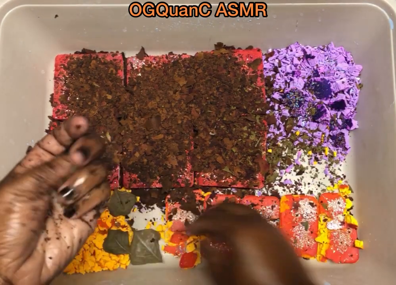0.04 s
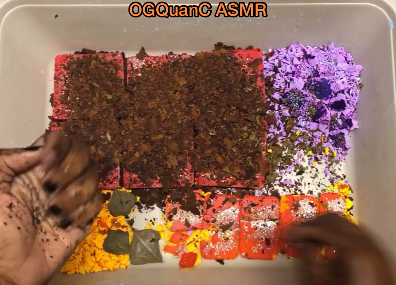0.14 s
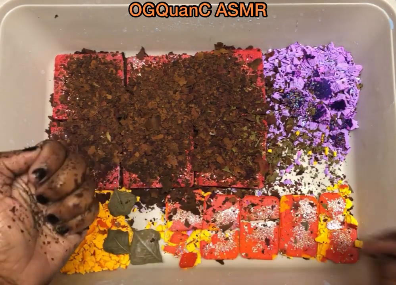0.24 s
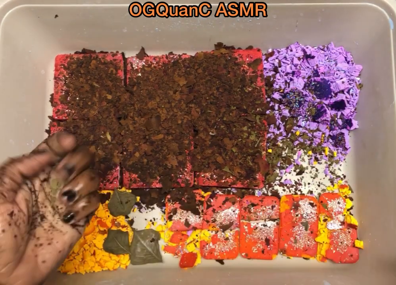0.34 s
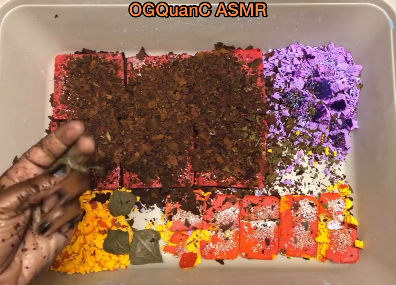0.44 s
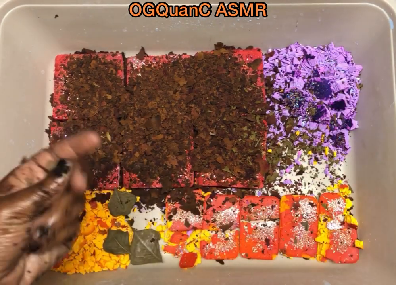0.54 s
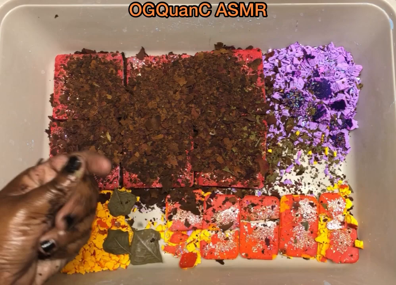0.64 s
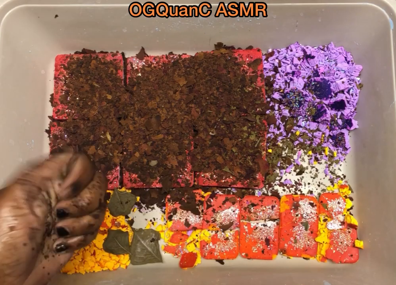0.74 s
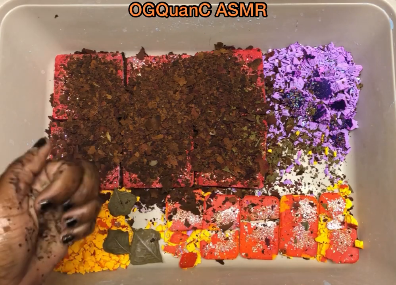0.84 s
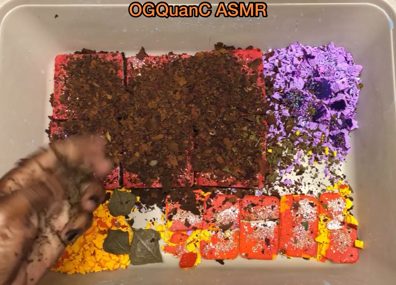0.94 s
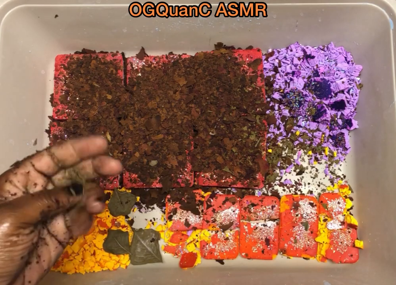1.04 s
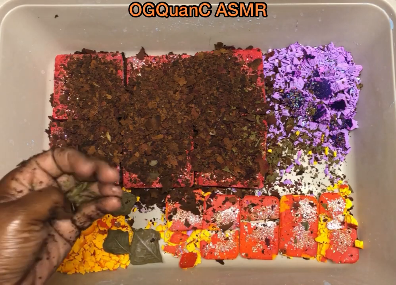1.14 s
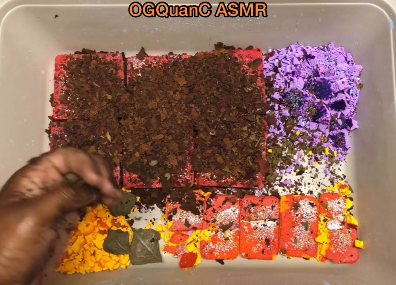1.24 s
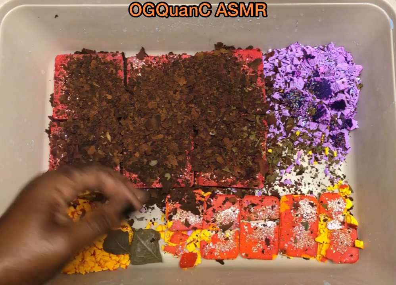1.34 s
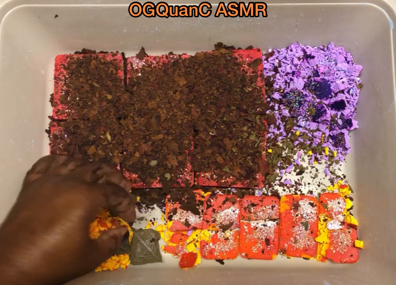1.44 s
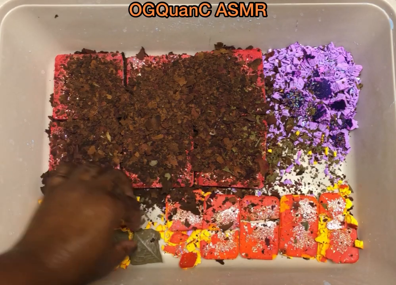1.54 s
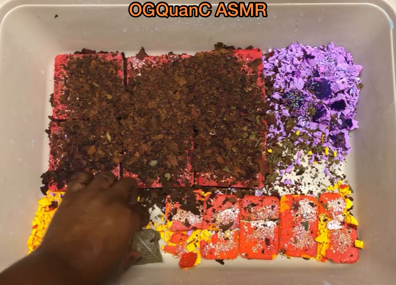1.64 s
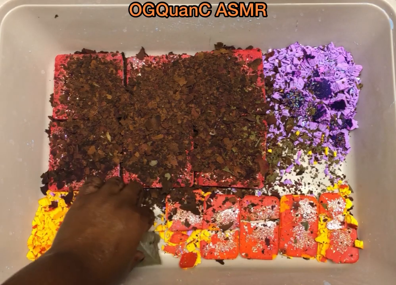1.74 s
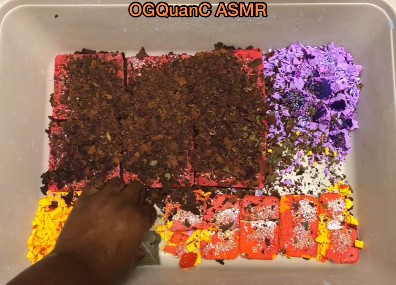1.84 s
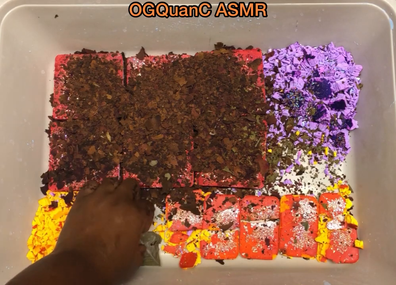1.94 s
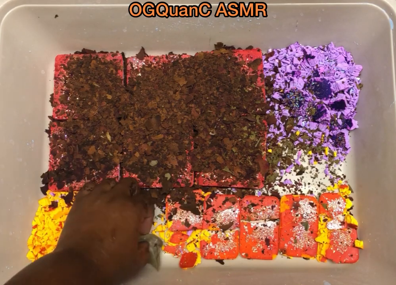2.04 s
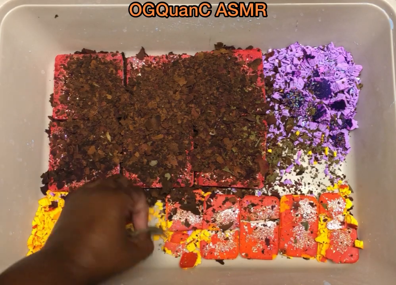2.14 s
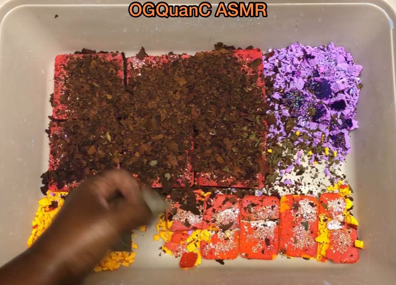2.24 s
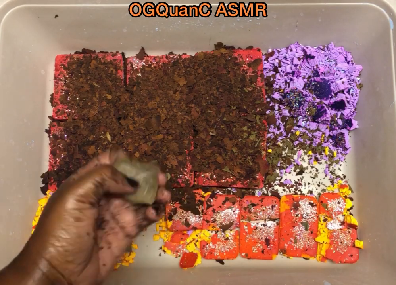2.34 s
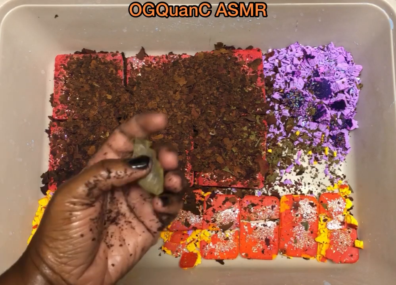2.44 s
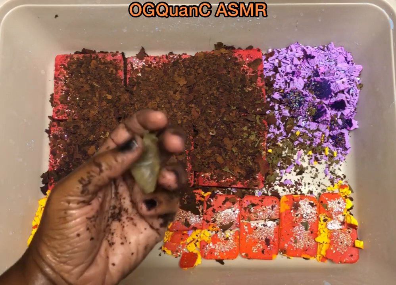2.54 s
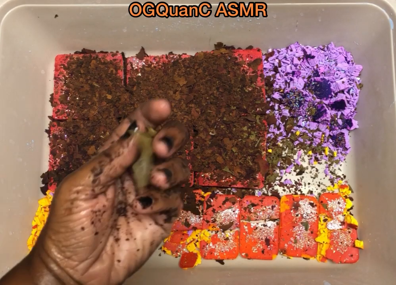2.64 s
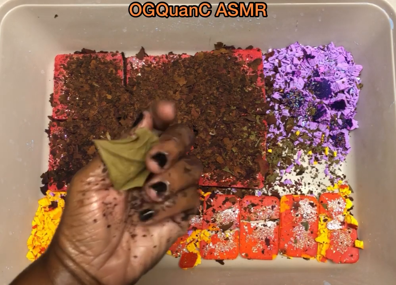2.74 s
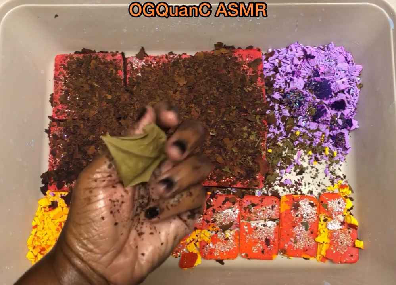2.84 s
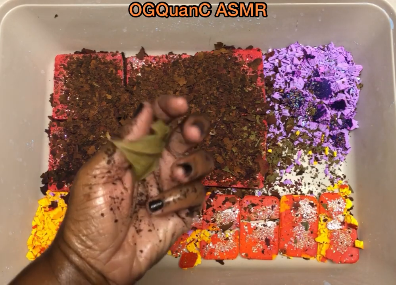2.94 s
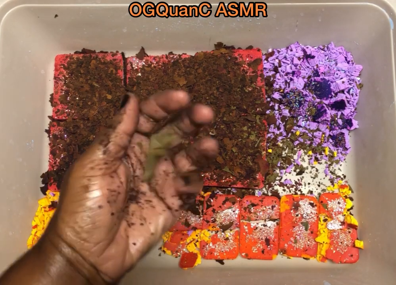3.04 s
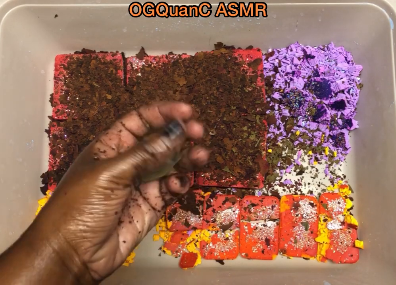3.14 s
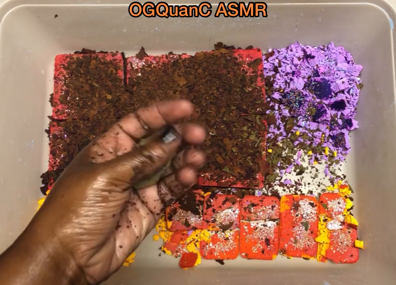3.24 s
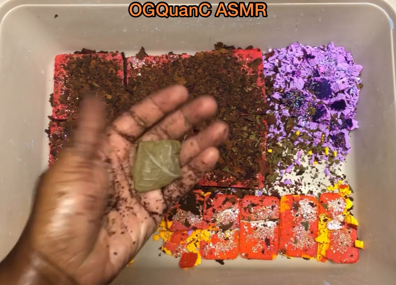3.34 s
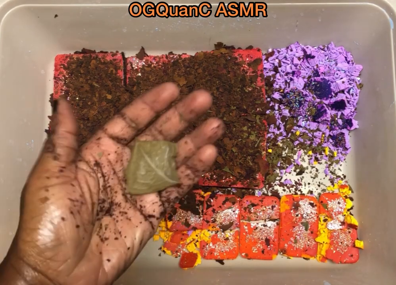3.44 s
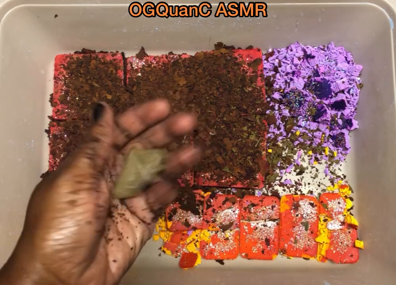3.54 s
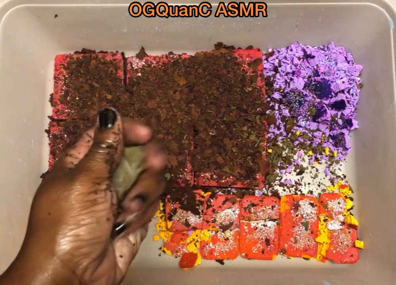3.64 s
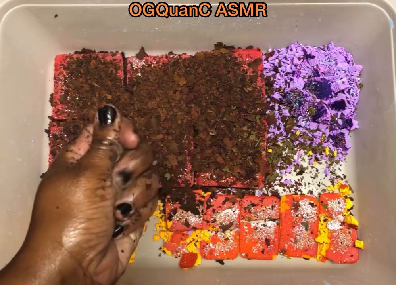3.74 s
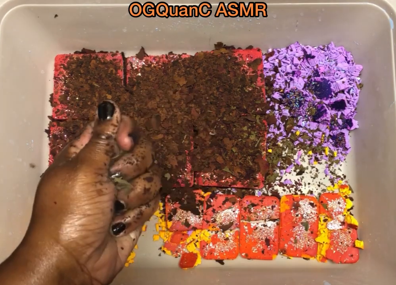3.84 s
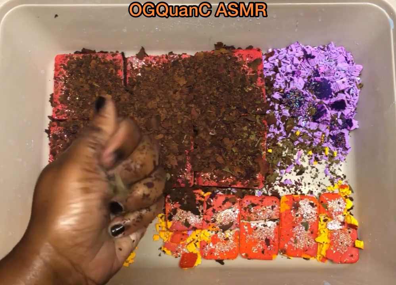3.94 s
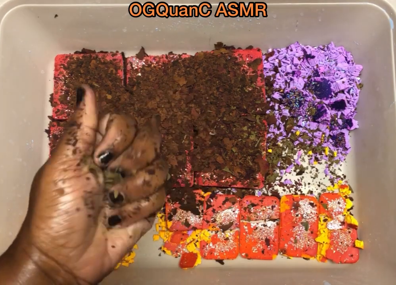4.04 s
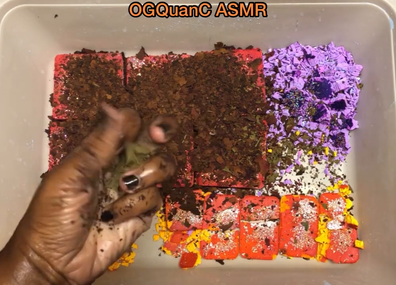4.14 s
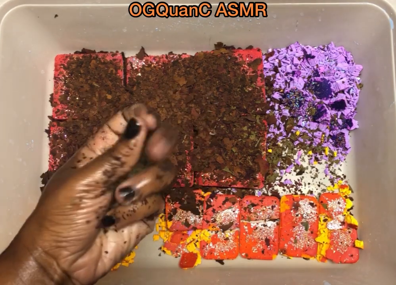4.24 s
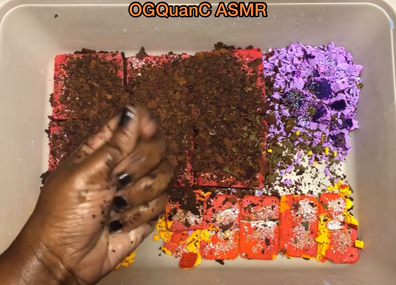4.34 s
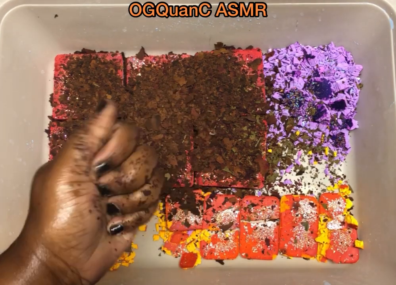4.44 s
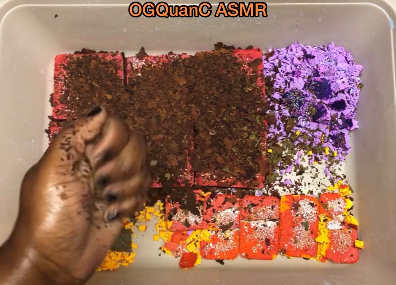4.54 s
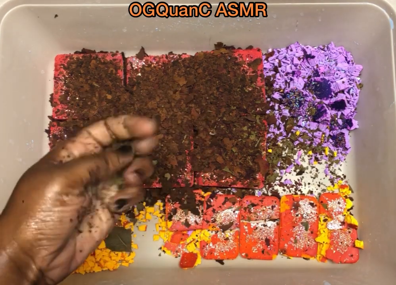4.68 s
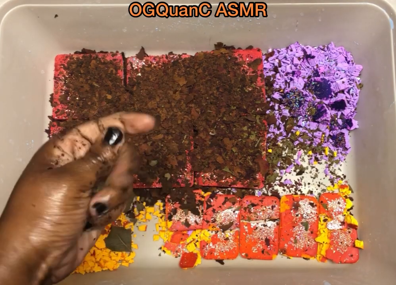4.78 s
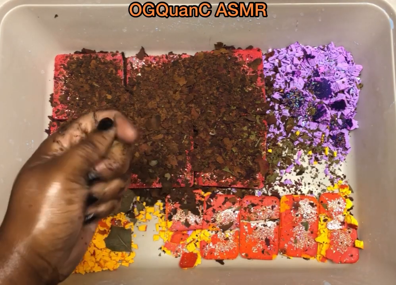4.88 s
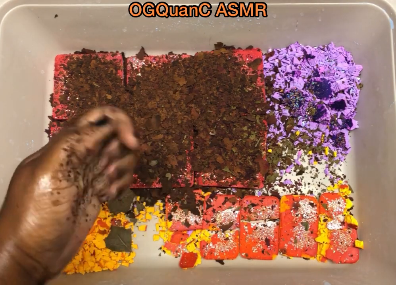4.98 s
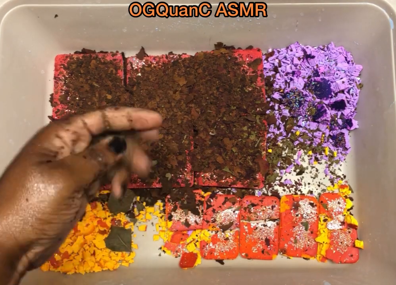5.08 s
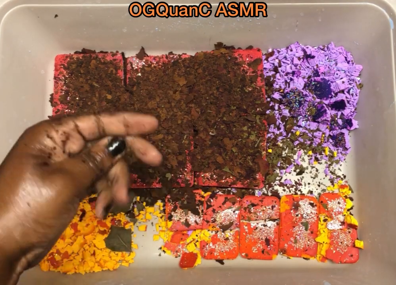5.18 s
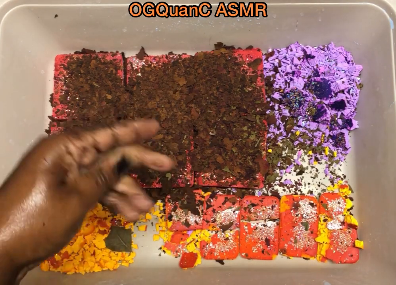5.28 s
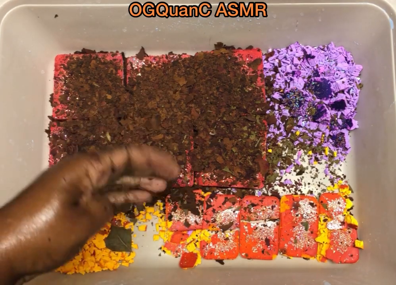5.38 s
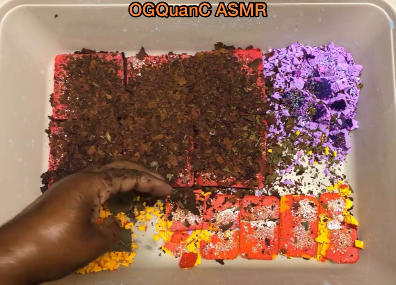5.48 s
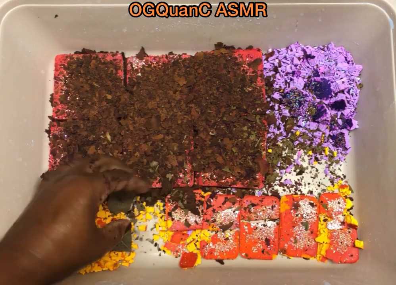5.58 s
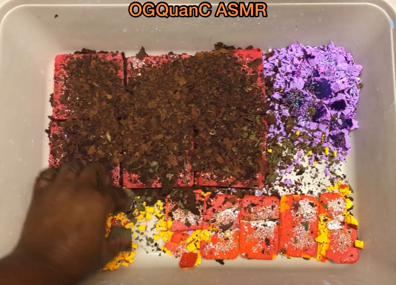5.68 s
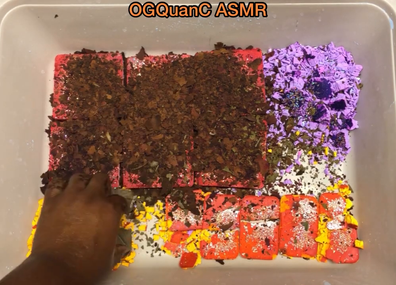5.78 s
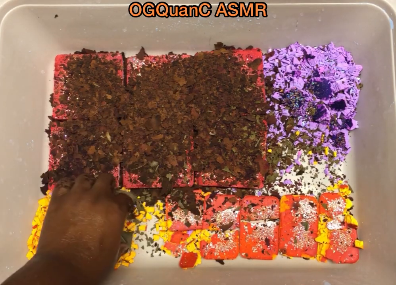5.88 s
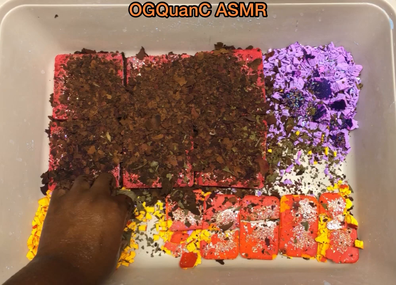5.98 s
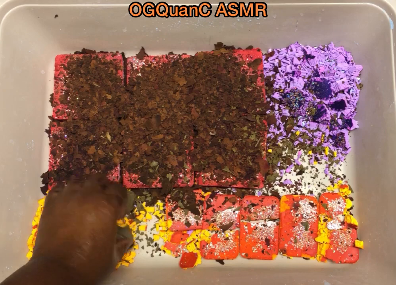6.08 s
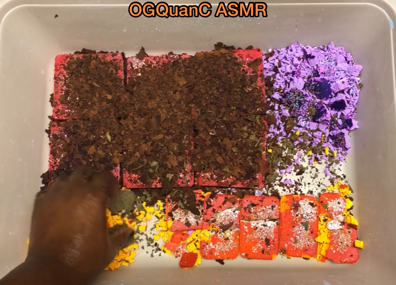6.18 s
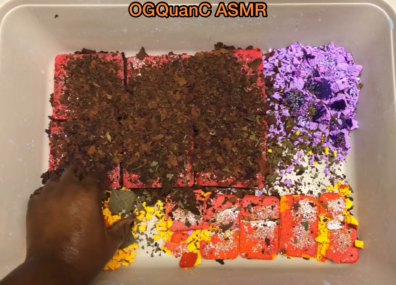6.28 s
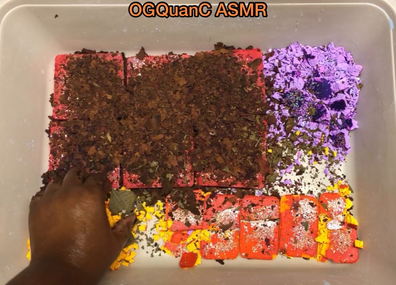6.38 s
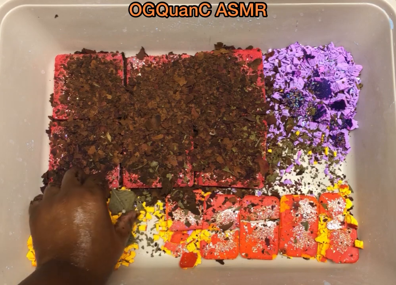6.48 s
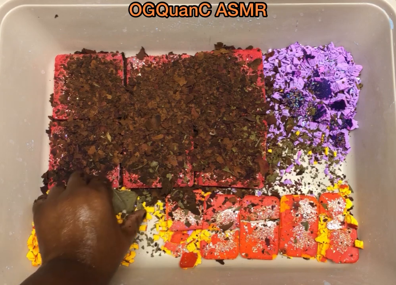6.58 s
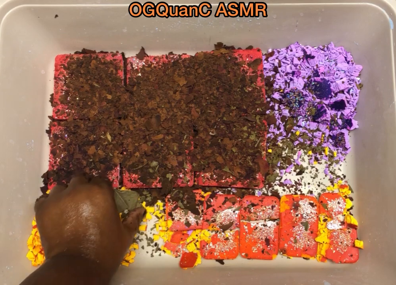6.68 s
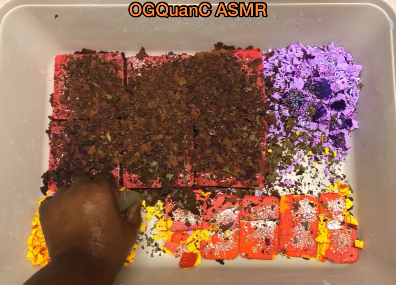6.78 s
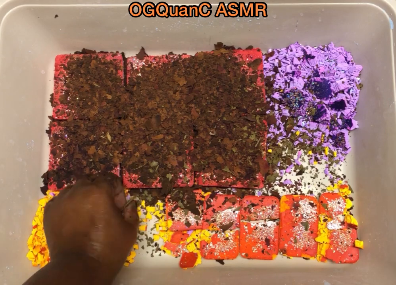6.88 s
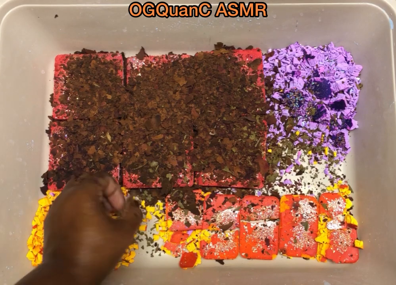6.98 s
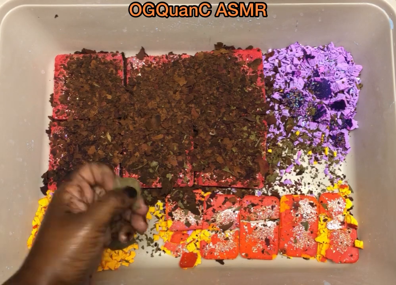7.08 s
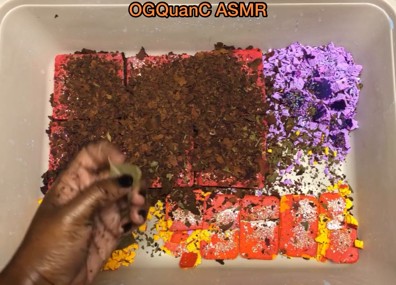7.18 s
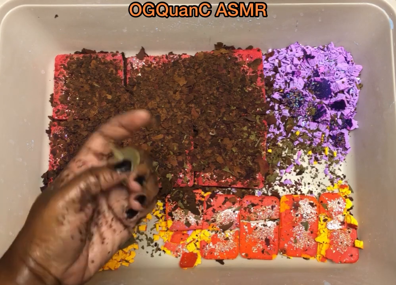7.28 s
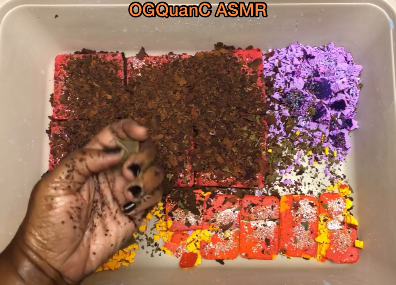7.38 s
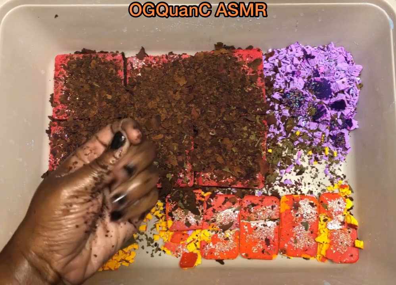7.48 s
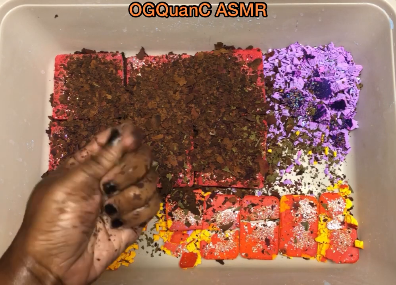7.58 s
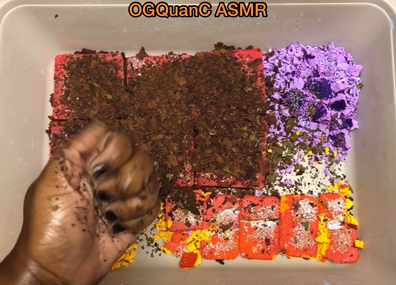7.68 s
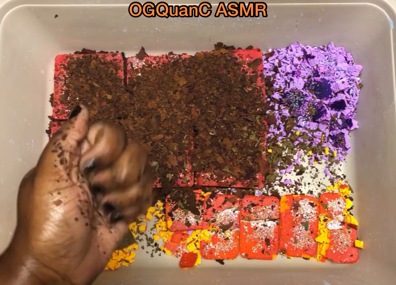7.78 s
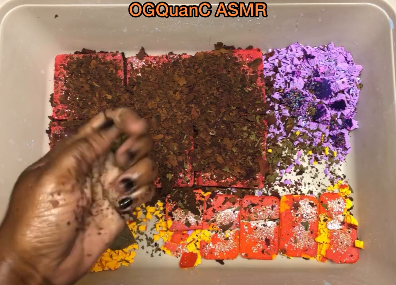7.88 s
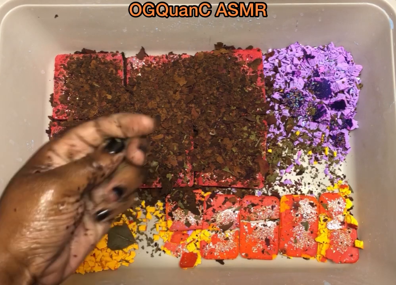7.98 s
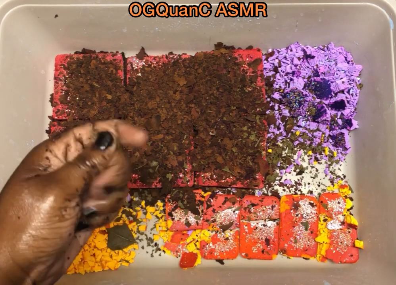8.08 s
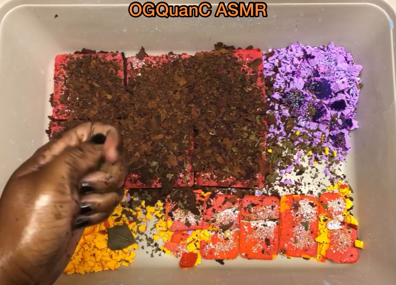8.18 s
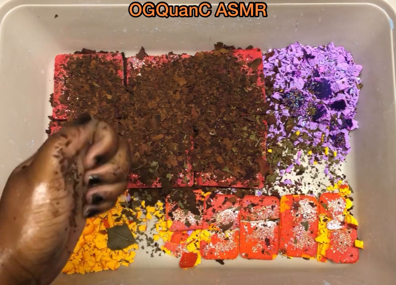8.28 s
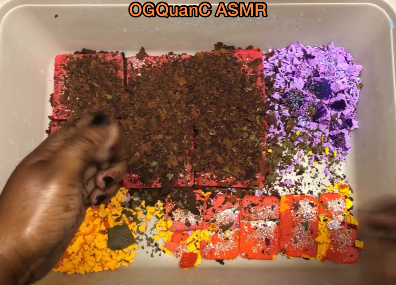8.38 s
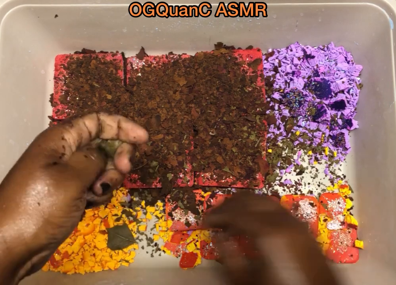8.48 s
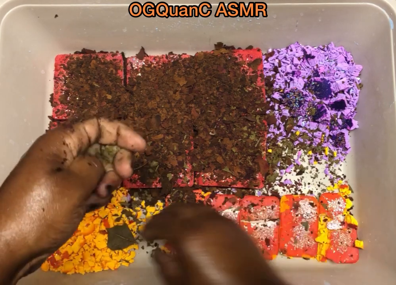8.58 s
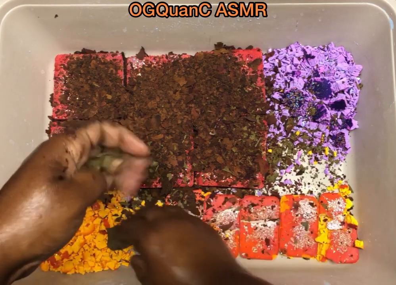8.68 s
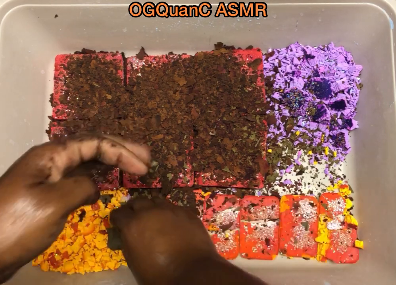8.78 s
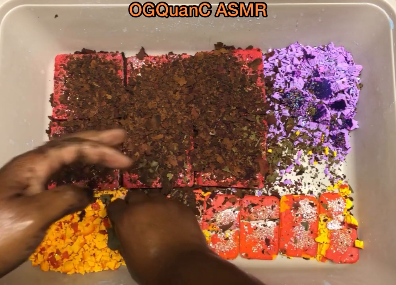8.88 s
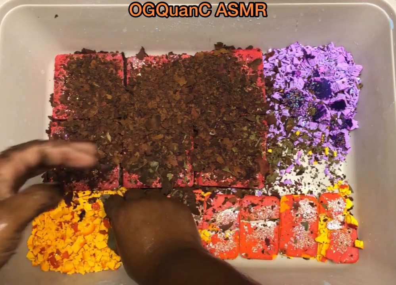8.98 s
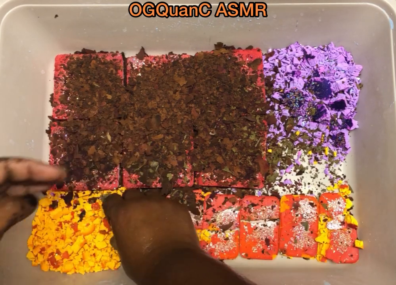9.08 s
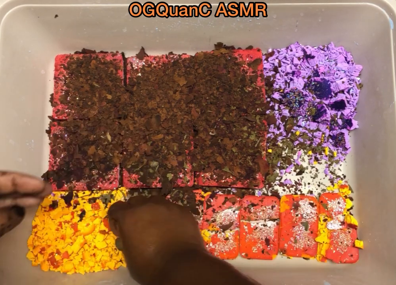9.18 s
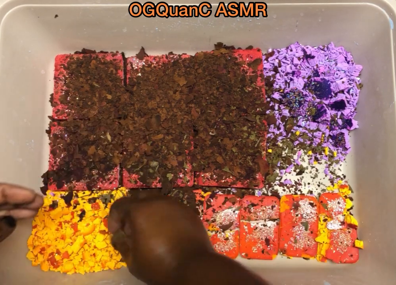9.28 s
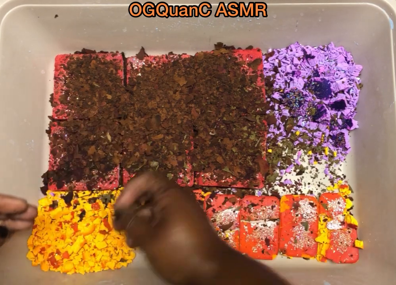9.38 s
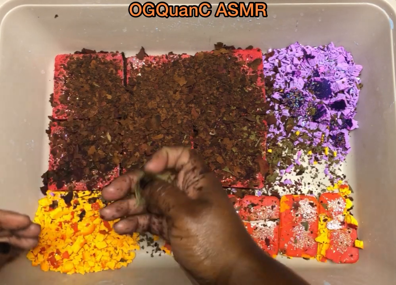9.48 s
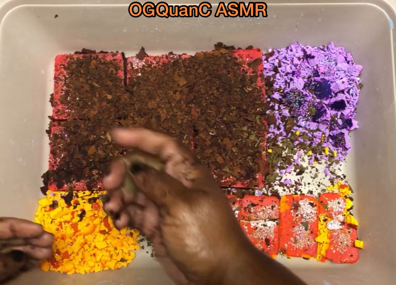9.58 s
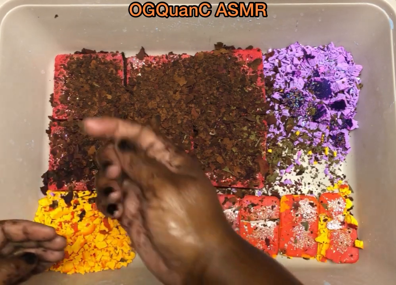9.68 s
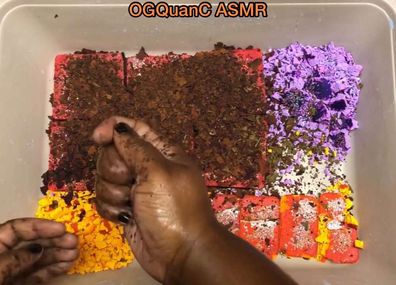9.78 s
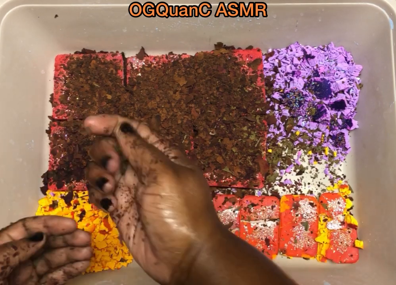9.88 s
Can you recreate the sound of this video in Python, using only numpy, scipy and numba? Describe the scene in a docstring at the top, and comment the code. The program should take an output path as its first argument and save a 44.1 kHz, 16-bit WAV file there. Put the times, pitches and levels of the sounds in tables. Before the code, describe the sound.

Close, dry and detailed, in a small room with short plastic tub reflections. At 0 seconds a rapid cluster of bright brittle snaps with gritty crackle fades within a quarter second. Light powdery rubbing and small ticks follow, with a few cracks near 0.6 and 1.1 to 1.5. From 2.0 to 2.7 stronger crunches come in uneven bursts, with a little digging. After a quieter second, the loudest, densest crunch bursts at 3.65 to 3.75, then trickling grit and scattered small cracks until 5.7. At 5.8 a snap joins dull crumb digging and low tub thuds, more soft bumps to 6.7. A hard crunch hits at 7.1, lighter crumbling from 7.3 to 8.6, soft digging at 9, snaps at 9.35 and a final crackling cluster at 9.65. Barely audible thin squeaks slide by at 2.8, 6.5 and 8.8. Low hum fades by 3.5 over steady rumble and faint hiss.

```python
"""Sharp snaps and a burst of gritty crackle come first: hands crush dry chalk over a plastic tub of crumbs.
Each snap is a short noisy push that rings briefly; the grit is filtered noise made of many tiny cracks,
coloured by the hollow of the fist. Later, fingers dig with a duller crunch in the crumbs and bump the tub,
whose floor rings low. A few faint squeaks slide by. A hum fades over a steady low rumble and soft hiss."""
import sys
import numpy as np
from scipy import signal
from scipy.fft import rfft, irfft
from scipy.io import wavfile
from scipy.ndimage import uniform_filter1d
from numba import njit

SR = 44100
rng = np.random.default_rng(int(sys.argv[2]) if len(sys.argv) > 2 else 0)


def wav_out(sig):
    """Save sig, one row per channel (or a flat mono array), as 16-bit PCM at SR to the path in sys.argv[1]."""
    wavfile.write(sys.argv[1], SR, np.round(np.clip(np.atleast_2d(sig).T, -1, 1) * 32767).astype(np.int16))


N = 437472
TIME = np.arange(N) / SR   # s

# A piece breaks: t/s, level/dB, crack length/s (the push fades over 1.4 times this),
# fragment pitch f/Hz, low knock relative to the crack/dB (before a shared trim)
PIECE_SNAPS = [(.0092, -7.5, 0.0037, 4670, -45), (.0262, -7.5, 0.0037, 4700, -36),
               (.0423, -9, .0036, 6800, -36), (.051, -9.5, .0024, 6100, -36),
               (.0728, -14, 0.0077, 7500, -37), (.124, -13.5, 0.01, 7440, -19.5),
               (.2202, -23.5, 0.0066, 4430, -9.5), (.58, -17, 0.0024, 8600, -36),
               (.5865, -13.5, 0.0028, 8900, -43), (.6507, -27, .0008, 8400, -39),
               (.7192, -26.5, 0.002, 9300, -30), (.841, -33, 0.0011, 4200, -8.5),
               (1.0435, -28.5, 0.0015, 7800, -20), (1.1446, -17, 0.0041, 7900, -44),
               (1.3655, -39.5, 0.0014, 9400, -19), (1.4143, -17, 0.0023, 8600, -44),
               (1.4501, -18.5, 0.0011, 8300, -23), (1.4818, -18.5, 0.0042, 8500, -20),
               (1.5712, -22, 0.0012, 9100, -41), (1.641, -36, 0.0019, 13000, -26),
               (1.718, -37.5, 0.0029, 8100, -26), (1.8038, -20, 0.0051, 7750, -9.5),
               (1.8409, -17, 0.0033, 6650, -14), (1.9904, -12, .005, 7550, -14),
               (2.029, -7.5, 0.0016, 7850, -27), (2.044, -8.5, 0.0051, 12400, -16),
               (2.0497, 0, .002, 7150, -23), (2.0666, -17, .0024, 7100, -24),
               (2.1436, -16, 0.0015, 8550, -23), (2.3182, -15, .003, 6070, -18),
               (2.3953, -7, 0.0031, 7700, -13), (2.4278, -6.5, 0.0019, 8100, -16.5),
               (2.4607, -21, 0.0037, 6600, -17), (2.6896, -5, 0.0042, 7600, -16.5),
               (3.1001, -31, 0.005, 6650, -10.5), (3.652, -6.5, 0.0013, 6150, -20.5),
               (3.6765, 2, 0.0034, 5830, -20), (3.6883, -8, 0.0016, 7000, -11),
               (3.7136, 4, 0.0018, 7960, -40), (3.7348, -1, 0.0022, 6450, -37),
               (3.7517, -10, 0.015, 7240, -41), (3.92, -21, 0.0011, 6900, -14),
               (4.0346, -19.5, 0.00047, 8400, -46), (4.474, -16, 0.0014, 7350, -20),
               (4.746, -17.5, 0.0045, 7900, -44), (4.8549, -25, 0.0071, 7400, -7),
               (4.89, -20.5, .0037, 5550, -19), (4.9614, -22.5, 0.0007, 11000, -38),
               (5.1862, -22, 0.0033, 8700, -56), (5.5959, -19, 0.0051, 7700, -43),
               (5.6598, -23.5, 0.0019, 11700, -35), (5.687, -28, 0.0049, 8700, -32),
               (5.77, -3, 0.0011, 9400, -22), (5.78, -7, 0.0033, 8160, -26),
               (5.7986, -11.5, .001, 8500, -18), (5.829, -15.5, 0.0043, 7650, -18),
               (6.124, -37, .005, 6650, -23), (6.6456, -24.5, 0.0068, 4670, -11),
               (6.8555, -21, .0044, 5070, -7.5), (6.9077, -28, 0.001, 8500, -11),
               (6.9172, -29, 0.0011, 2780, -3), (7.0757, -10.5, .002, 10600, -20),
               (7.0931, 1, 0.0021, 6540, -17.5), (7.1142, -5, 0.0047, 12500, -23.5),
               (7.3323, -9.5, 0.0016, 11200, -21.5), (7.3775, -19.5, 0.0063, 9000, -14),
               (7.4885, -16, 0.003, 7500, -22), (7.5788, -16.5, .0022, 8000, -25),
               (7.6037, -12.5, 0.0028, 8040, -23), (7.6396, -13.5, 0.0073, 7000, -23),
               (7.9596, -20, 0.002, 7360, -30), (8.1375, -24.5, 0.0025, 6700, -25),
               (8.2577, -16, 0.0021, 8100, -39), (8.4965, -25, 0.0011, 7550, -17),
               (8.586, -24, 0.0045, 7900, -17), (8.8755, -31.5, 0.0031, 8550, -44),
               (9.1179, -37.5, 0.0036, 1900, 11), (9.1542, -27, .003, 3130, -6),
               (9.34, -5.5, 0.0035, 11900, -25), (9.3963, -15.5, 0.0013, 9600, -40),
               (9.405, -13.5, 0.0039, 9600, -19), (9.494, -17, 0.0054, 8900, -13),
               (9.6514, -10, 0.0015, 8100, -35), (9.6576, -1.5, 0.0025, 7700, -45),
               (9.673, -11.5, .0024, 7900, -31), (9.6915, -9, 0.0027, 7840, -35),
               (9.7323, -13.5, 0.0037, 9300, -16)]
# The fist closes on the pieces and its hollow changes size: t/s, hold/s, grit level/dB,
# change over the hold/dB, ring of the hollow relative to the grit/dB,
# hollow start f/Hz, hollow end f/Hz, brightness/dB (before a shared lift)
FIST_SQUEEZES = [(0, .13, -18.5, -8, -2.5, 3580, 3650, -13), (.15, 0.078, -37, 5, -1, 3500, 3450, 1),
                 (.665, 0.055, -47, 9, -5, 2700, 2240, 0), (.72, 0.061, -34, -4.5, -8, 3470, 3700, 1),
                 (.78, 0.087, -41, -5, 0, 3320, 2740, -3), (1.42, 0.092, -28, -8.5, -25, 3600, 3600, -2),
                 (1.99, 0.11, -29.5, 7, -9, 2930, 2650, -4), (2.325, 0.1, -26.5, -5, -5.5, 3260, 3400, -12),
                 (2.69, 0.037, -28.5, -4, -3.5, 3070, 3070, -2), (3.68, 0.071, -14, -1.5, 1, 2920, 2500, 4),
                 (3.76, 0.13, -22.5, -8, -4, 2350, 2530, -3),
                 (3.915, 0.032, -27.5, 0.5, -2, 2680, 2740, -5),
                 (3.97, 0.14, -38, -7.5, -12, 2770, 3020, -4),
                 (4.355, 0.12, -33, 0.5, -3.5, 2450, 2800, -7),
                 (4.525, 0.059, -33, -3.5, -12, 3000, 3740, -9),
                 (4.75, 0.16, -35.5, 3.5, -9, 3400, 2240, -2), (4.89, .11, -33, -8.5, -9, 2600, 3300, 2),
                 (7.09, 0.057, -28, -9.5, 1.5, 3150, 3150, -5),
                 (7.462, 0.088, -27.5, -2.5, -5.5, 3050, 3080, -6),
                 (7.575, 0.14, -27.5, -1, -11, 3050, 3030, -6),
                 (7.955, .13, -36.5, 0.5, -14, 3100, 3040, -2),
                 (8.135, 0.066, -30.5, -6, -19, 3120, 3150, -2),
                 (8.225, 0.073, -26.5, -9, -31, 3160, 2900, 0),
                 (8.32, 0.014, -44, -3.5, 10.5, 2850, 2700, 7), (9.66, 0.085, -22, -1, -6, 3700, 3130, 1)]
# Open fingers roll a piece or rub off powder: t/s, hold/s, grit level/dB, brightness/dB (before the same lift)
FINGER_RUBS = [(0.308, 0.0092, -38, -13), (0.368, 0.16, -53.5, -9), (0.5, 0.19, -42, -1),
               (0.56, 0.03, -32, -1), (0.932, 0.039, -48, 1), (1.024, 0.18, -39, 3),
               (1.225, 0.099, -53.5, 2), (1.765, .09, -33, -6), (1.896, 0.065, -33.5, -7),
               (2.269, .04, -36.5, -13), (2.53, 0.032, -46, -10), (2.605, 0.03, -37.5, -16),
               (2.865, 0.074, -44.5, -25), (3.154, 0.062, -36.5, -7), (3.274, 0.057, -47, -12),
               (3.35, 0.1, -59, -14), (3.489, 0.012, -46, -18), (3.545, 0.04, -35.5, -10),
               (3.631, .03, -32, -11), (4.157, .1, -49.5, -2), (4.255, 0.074, -41.5, -3),
               (4.63, 0.17, -54, 3), (5.015, 0.19, -48, 1), (5.208, 0.11, -38, 3), (5.272, .08, -32, 2),
               (5.366, 0.054, -35.5, 8), (5.495, 0.063, -41.5, 1), (5.592, 0.02, -28, -2),
               (5.759, 0.043, -19, -5), (5.828, .16, -39.5, -7), (6.587, 0.27, -38.5, -2.5),
               (7.006, 0.073, -39, 1), (7.324, 0.11, -42, 1), (7.809, 0.014, -40, -7),
               (7.86, 0.094, -51.5, -8), (8.365, .09, -53.5, -6), (8.46, 0.035, -34, -7),
               (8.522, 0.15, -41, 0), (8.925, 0.24, -45.5, 0), (9.252, 0.021, -38.5, -6),
               (9.329, 0.026, -32.5, 2), (9.398, 0.033, -35.5, 2), (9.492, 0.0055, -27.5, 0),
               (9.613, 0.023, -31.5, 4), (9.755, 0.024, -29.5, 5), (9.856, .015, -40, 0)]
# Fingers push into the bed of crumbs: t/s, hold/s, level/dB, change over the hold/dB
BED_DIGS = [(1.779, 0.18, -38.5, -6.5), (1.991, 0.17, -30.5, 1), (2.318, 0.16, -48, 2),
            (2.614, .04, -44, -5), (5.767, 0.089, -26.5, -10), (5.834, .17, -34.5, -3.5),
            (6.016, 0.018, -28.5, -1.5), (6.294, 0.014, -38, -3.5), (6.383, 0.0071, -33, -0.5),
            (6.588, 0.29, -42, 4.5), (6.912, 0.0078, -41, 1), (7.1, 0.047, -44, -5),
            (8.985, 0.26, -38.5, -5)]
# The hand bumps the tub: t/s, level/dB, time to fall by 60 dB/s
TUB_BUMPS = [(2.048, -34.5, 0.23), (3.69, -43, .15), (5.777, -23, 0.16), (5.795, -29.5, 0.29),
             (6.031, -34, 0.27), (6.305, -34.5, 0.15), (6.397, -29.5, 0.35), (6.712, -32.5, 0.2),
             (7.096, -34, 0.062)]
# Ways the tub floor rings: f/Hz, level/dB
FLOOR_MODES = [(84, 4.5), (101, -1.5), (132, -2), (178, -7), (320, -11.5), (430, -27), (560, -25.5)]
# Tone colour of the crack of a snap: f/Hz, level/dB
CRACK_COLOUR = [(200, -18.5), (900, -20), (1800, -15.5), (2800, -4), (4000, 0), (5500, -3), (7800, 0.5),
                (11000, -2), (15500, 1)]
# Tone colour of the low knock under a snap: f/Hz, level/dB
KNOCK_COLOUR = [(80, -44), (250, 0), (600, 1.5), (1200, 5), (1800, 12.5), (2800, -5.5), (8000, -62)]
# Tone colour of the grit: f/Hz, level/dB
GRIT_COLOUR = [(300, -27.5), (1500, -37), (3200, -8.5), (4600, -5), (6000, -0.5), (7600, 2), (9500, -1.5),
               (12000, -1.5), (15500, -12)]
# Tone colour of the bed of crumbs: f/Hz, level/dB
BED_COLOUR = [(120, -25), (300, -6.5), (600, -8), (900, 0.5), (1300, 3), (1700, -0.5), (2400, 0),
              (5000, -8), (12000, -20.5)]
# Faint thin squeaks: t/s, length/s, start f/Hz, end f/Hz, level/dB
THIN_SQUEAKS = [(2.8, 0.063, 3480, 3980, -55), (6.465, 0.046, 5570, 5480, -59),
                (8.835, 0.045, 5540, 5400, -58)]
# Machine hum in the room: f/Hz, level/dB (before the fade)
HUM_TONES = [(134.6, -47), (193.8, -49.5), (290.7, -66)]
# How the hum fades: t/s, level/dB
HUM_LEVEL = [(0, 3.5), (1.2, -1), (2.2, -3.5), (3.5, -14.5), (9.9, -15)]
# Tone colour of the room rumble: f/Hz, level/dB
RUMBLE_COLOUR = [(15, 2.5), (25, 4.5), (40, 3.5), (58, 2), (75, -9), (95, -4), (120, -4.5), (140, -3.5),
                 (195, -6.5), (240, -17), (330, -17), (500, -25), (1000, -29), (2500, -43.5)]
# Tone colour of the hiss: f/Hz, level/dB
HISS_COLOUR = [(200, -20), (1500, 7.5), (5000, -1), (16000, -26.5)]

RUB_HOLLOW_DB, RUB_HOLLOW_HZ = -18.5, 3200   # the open hand hardly rings
# Every stroke swells, holds and lets go; loose crumbs trickle on after it.
SWELL_DB_PER_S, RELEASE_DB_PER_S = 884, 482   # the swell speed is for a stroke at ORDINARY_DB
SWELL_FOLLOWS, ORDINARY_DB = 0.37, -39   # dB of swell speed per dB of strength above an ordinary stroke
TRICKLE_DB, TRICKLE_DB_PER_S = -18, 102
IDLE_GRIT_DB, IDLE_BED_DB = -65, -68
SPILL_DB = -18.5   # crumbs spilling from the hand into the bed, relative to the grit
# Small splinters break off at random; their level is relative to the grit.
SPLINTERS_PER_S, SPLINTER_DB = 26, 7
SPLINTER_S, SPLINTER_HZ, SPLINTER_KNOCK_DB = 0.0025, 8200, -19
SPLINTER_SPREAD_OCTAVES = 0.3
CUTOFF_HZ = 16200


def snaps(rows, hollow_hz, size=1024, slips_per_s=2200, rough_db=5, ring_q=2.0, ring_db=12.5,
          hollow_db=-1, hollow_width_hz=850, knock_db=-1):
    """A crack runs through a piece in a few slips; the fragment, the fist and the bed below ring briefly."""
    out, t = np.zeros(N), np.arange(size) / SR
    crack = impulse_response(CRACK_COLOUR, size=size)
    knock = impulse_response(KNOCK_COLOUR, size=size)
    unit = np.sqrt(.005 * SR / size)   # unit rms becomes the energy of 5 ms at level one
    for s, db, length, hz, low_db in rows:
        slips = (rng.random(size) < slips_per_s / SR) * rng.choice([-1, 1], size)
        slips = slips * from_db(rough_db * np.clip(rng.standard_normal(size), -2, 1))
        slips[0] = 0.81   # every crack opens with a slip of fixed, moderate strength
        fade = np.exp(-(t / (1.4 * max(length, .0003))) ** 1.8)
        force = (slips + 0.19 * rng.standard_normal(size)) * fade
        raw = through(force, crack)
        fragment = from_db(ring_db) * resonate(raw, hz, hz / ring_q)
        # low-pitched fragments drive the fist's hollow hardest
        fist_hz = hollow_hz[min(int(s * SR), N - 1)]
        fist = from_db(hollow_db) * (7000 / hz) ** 2 * resonate(raw, fist_hz, hollow_width_hz)
        low = from_db(low_db + knock_db) * rms_one(through(force, knock))
        add(out, s, unit * from_db(db) * (rms_one(1.44 * raw + fragment + fist) + low))
    return out


def splinters(grit_db, loudest_db=-19, count=500):
    """Random small snaps grow louder with the grinding; gives rows like those of PIECE_SNAPS."""
    when, chance = rng.random((count, 2)).T
    colour = np.clip(rng.standard_normal(count), -2, 2)
    at = (when * N).astype(int)
    db = np.minimum(grit_db[at] + SPLINTER_DB, loudest_db)
    hz = SPLINTER_HZ * 2 ** (SPLINTER_SPREAD_OCTAVES * colour)
    kept = np.flatnonzero(chance < SPLINTERS_PER_S * TIME[-1] / count)
    return [(TIME[at[k]], db[k], SPLINTER_S, hz[k], SPLINTER_KNOCK_DB) for k in kept]


def hand():
    """Squeezes and rubs add up to grit dB, hollow dB, hollow Hz and brightness dB; strong strokes set the colour."""
    rubs = [(s, hold_s, db, 0, RUB_HOLLOW_DB, RUB_HOLLOW_HZ, RUB_HOLLOW_HZ, bright_db)
            for s, hold_s, db, bright_db in FINGER_RUBS]
    grit = hollow = pitch = bright = 0
    for s, hold_s, db, change_db, ring_db, start_hz, end_hz, bright_db in list(FIST_SQUEEZES) + rubs:
        power = stroke(s, hold_s, db, change_db)
        ring = power * from_db(ring_db) ** 2
        hz = np.interp(TIME, [s, s + abs(hold_s)], [start_hz, end_hz])
        grit, hollow = grit + power, hollow + ring
        # averages in which stronger strokes count more
        pitch, bright = pitch + ring * hz, bright + power * bright_db
    # even between strokes the powder on the hands whispers
    return power_db(grit + from_db(IDLE_GRIT_DB) ** 2), power_db(hollow), pitch / hollow, bright / grit


def stroke(s, hold_s, db, change_db=0):
    """Power of one stroke of the hand: swell, a hold that may rise or sink, release, then a trickle."""
    early, late = np.maximum(s - TIME, 0), np.maximum(TIME - s - hold_s, 0)
    swell_speed = SWELL_DB_PER_S * from_db(SWELL_FOLLOWS * (db - ORDINARY_DB))   # harder is more abrupt
    progress = np.clip((TIME - s) / max(hold_s, .001), 0, 1)
    held_db = db + change_db * progress - swell_speed * early
    fade_db = np.maximum(-RELEASE_DB_PER_S * late, TRICKLE_DB - TRICKLE_DB_PER_S * late)
    return from_db(np.maximum(held_db + fade_db, -150)) ** 2


def grinding(grit_db, hollow_db, hollow_hz, bright_db, bright_hz=10500, bright_lift_db=3.0,
             rub_db=-9, break_db=-38, rub_per_db=0.24):
    """Grit cracks inside the fist, whose hollow rings at a moving pitch while the top brightens or dulls."""
    # a light touch adds a little more smooth rubbing; firmer pressure leaves more separate grain cracks
    smooth_db = rub_db + rub_per_db * np.clip(break_db - grit_db, -5, 15)
    power = fractures(per_s=750, spread_db=5.0, life_s=0.00046)
    cracks = grains(power, smooth_db=smooth_db, colour_db=5.5)
    grit = through(cracks, impulse_response(GRIT_COLOUR))
    high_pass = signal.butter(3, bright_hz, "high", fs=SR, output="sos")
    top = signal.sosfiltfilt(high_pass, grit)
    grit = evened(grit + (from_db(bright_db + bright_lift_db) - 1) * top)
    hollow = evened(fist_hollow(cracks, hollow_hz))
    return from_db(grit_db) * grit + from_db(hollow_db) * hollow


def fist_hollow(x, hz, width_hz=1250, upper_db=-6, upper_width_hz=1900,
                third_db=-7, third_width_hz=2400, low_cut_hz=1600):
    """The fist is a short pipe closed at one end: a quarter-wave mode, its third and a cross mode between."""
    out = 0
    modes = [(1, width_hz, 0.0053), (1.5, upper_width_hz, upper_db), (3, third_width_hz, third_db)]
    for ratio, width, db in modes:
        turn, r = 2 * np.pi * ratio * hz / SR, np.exp(-np.pi * width / SR)
        once = glide(x, turn, r)
        out = out + from_db(db) * glide(once, turn, r)   # two passes make it steeper
    return signal.sosfilt(signal.butter(4, low_cut_hz, "high", fs=SR, output="sos"), out)


def fractures(per_s, spread_db, life_s):
    """Power of tiny fractures: random instants, many small and few large, each dying quickly."""
    at = np.flatnonzero(rng.random(N) < per_s / SR)
    sizes = np.minimum(rng.exponential(1, len(at)), 3.2)
    power = np.full(N, 1e-12)
    power[at] = from_db(spread_db * sizes) ** 2
    power = signal.lfilter([1], [1, -np.exp(-2 / (life_s * SR))], power)
    return power / power.mean()


def grains(power, smooth_db, colour_db, count=15):
    """Fractures excite all bands at once, each with its own colour, over a smooth rub of powder."""
    out, edges = 0, np.geomspace(900, 17000, count + 1)   # band edges, Hz
    knots = np.arange(0, TIME[-1] + .01, .004)   # the colour changes every 4 ms
    forces = rng.standard_normal((2, N)) * np.sqrt(power + from_db(smooth_db) ** 2)
    for k in range(count):
        low_hz = edges[k] if k else 100   # the first band reaches down to 100 Hz
        band = signal.butter(2, [low_hz, edges[k + 1]], "band", fs=SR, output="sos")
        colour = from_db(colour_db * np.clip(rng.standard_normal(len(knots)), -2, 1.5))
        out = out + signal.sosfilt(band, forces[k % 2] * np.interp(TIME, knots, colour))
    return out


def digging(bed_db):
    """Crumbs rub and shift in the bed with a duller, denser crunch."""
    power = fractures(per_s=900, spread_db=5, life_s=0.0024)
    crunch = grains(power, smooth_db=-18.0, colour_db=3.5)
    return from_db(bed_db) * evened(through(crunch, impulse_response(BED_COLOUR)))


def bed_level(grit_db):
    """The bed is stirred by digging fingers and by what spills from the hand; gives dB."""
    dug = sum(stroke(*dig) for dig in BED_DIGS)
    spilled = from_db(grit_db + SPILL_DB) ** 2
    return power_db(dug + spilled + from_db(IDLE_BED_DB) ** 2)


def bumps(size=16384, contact_s=0.0035):
    """Soft pushes set the loaded floor of the tub ringing."""
    out, t = np.zeros(N), np.arange(size) / SR
    for s, db, t60 in TUB_BUMPS:
        ringing = 0
        for hz, level in FLOOR_MODES:
            gain = from_db(level + rng.normal(0, 1.4))   # mode levels vary a little from bump to bump
            ringing = ringing + gain * np.sin(2 * np.pi * (hz * t + rng.random()))
        soft_start = 1 - np.exp(-t / contact_s)
        add(out, s, ringing * from_db(db - 60 * t / t60) * soft_start)
    return out


def tub_and_room(x, tub_db=-12, tub_t60=0.032, room_db=-15, room_t60=0.14, size=16384):
    """Quick reflections between the tub's walls, then the faint tail of a small room."""
    t = np.arange(size) / SR
    near = rng.standard_normal(size) * (rng.random(size) < .06)   # sparse echoes
    near = near * (t > .001) * from_db(-60 * t / tub_t60)
    far = rng.standard_normal(size) * (t > .006) * from_db(-60 * t / room_t60)
    far = through(far, impulse_response([(200, -4.0), (2000, 7.0), (7000, 2.0), (16000, -5.0)]))   # Hz, dB
    echoes = (from_db(tub_db) * rms_one(near) + from_db(room_db) * rms_one(far)) / np.sqrt(size)
    return x + through(x, echoes)


def squeaks():
    """Thin, slightly rough tones that slide, settle and die away."""
    out = np.zeros(N)
    for s, length, start_hz, end_hz, db in THIN_SQUEAKS:
        progress = np.linspace(0, 1, int(length * SR))
        hz = end_hz + (start_hz - end_hz) * (1 - progress) ** 2
        hz = hz + 900 * rng.standard_normal(len(progress))   # pitch jitter
        tone = np.sin(2 * np.pi * np.cumsum(hz) / SR)
        add(out, s, from_db(db) * np.sqrt(2) * np.sin(np.pi * progress) * tone)
    return out


def hum(waver=0.16, count=30):
    """Low machine tones that waver a little (in turns of the wave) and fade."""
    knots = np.linspace(0, TIME[-1], count)
    tones = 0
    for hz, db in HUM_TONES:
        drift = waver * np.interp(TIME, knots, rng.standard_normal(count))
        tones = tones + from_db(db) * np.sqrt(2) * np.sin(2 * np.pi * (hz * TIME + drift))
    fade_s, fade_db = np.transpose(HUM_LEVEL)
    return from_db(np.interp(TIME, fade_s, fade_db)) * tones


def background(rumble_db=-37.5, hiss_db=-62):
    """Steady room rumble and faint hiss, both made from filtered noise."""
    rumble = rms_one(through(rng.standard_normal(N), impulse_response(RUMBLE_COLOUR, size=16384)))
    hiss = rms_one(through(rng.standard_normal(N), impulse_response(HISS_COLOUR)))
    return from_db(rumble_db) * rumble + from_db(hiss_db) * hiss


def from_db(db):
    """Decibels to gain."""
    return 10 ** (np.asarray(db) / 20)


def power_db(power):
    """Power to decibels."""
    return 10 * np.log10(power)


def rms_one(x):
    """Scale to an rms (average strength) of one."""
    return x / np.sqrt(np.mean(x ** 2) + 1e-20)


def evened(x, window_s=0.068):
    """Hold the short-term level at one while single grains stay sharp."""
    power = uniform_filter1d(x * x, int(window_s * SR) + 1)
    power = uniform_filter1d(power, int(window_s * SR / 2) + 1)
    return x / np.sqrt(np.maximum(power, 1e-12))


def impulse_response(spectrum, size=4096):
    """Turn a tone colour into a filter that acts as early as possible (minimum phase)."""
    hz, db = np.transpose(spectrum)
    bins = np.maximum(np.arange(size // 2 + 1) * SR / size, 1)
    cepstrum = irfft(np.log(from_db(np.interp(np.log(bins), np.log(hz), db))))
    # fold the backward half onto the forward half
    cepstrum[1:size // 2] *= 2
    cepstrum[size // 2 + 1:] = 0
    return irfft(np.exp(rfft(cepstrum)))


def through(x, response):
    """Pass a sound through an impulse response."""
    return signal.fftconvolve(x, response)[:len(x)]


def resonate(x, hz, width_hz):
    """A resonance of unit height."""
    r = np.exp(-np.pi * width_hz / SR)
    drive = np.array([1, 0, -1]) * (1 - r * r) / 2
    return signal.lfilter(drive, [1, -2 * r * np.cos(2 * np.pi * hz / SR), r * r], x)


@njit
def glide(x, turn, r):
    """A resonance whose centre moves; turn is in radians per sample."""
    y = np.zeros(len(x))
    for i in range(2, len(x)):
        drive = (1 - r * r) / 2 * (x[i] - x[i - 2])
        y[i] = drive + 2 * r * np.cos(turn[i]) * y[i - 1] - r * r * y[i - 2]
    return y


def add(track, s, sound):
    """Mix a sound in at a given time."""
    at = int(np.clip(round(s * SR), 0, N - 1))
    track[at:at + len(sound)] += sound[:N - at]


def scene():
    """All the handling sounds in the tub, over squeaks, hum, rumble and hiss."""
    grit_db, hollow_db, hollow_hz, bright_db = hand()
    cracks = snaps(list(PIECE_SNAPS) + splinters(grit_db), hollow_hz)
    cracks = tub_and_room(cracks, tub_db=-17.0, room_db=-16)
    crumbs = grinding(grit_db, hollow_db, hollow_hz, bright_db) + digging(bed_level(grit_db))
    # crumbs lie low between the walls, so their tub echoes are stronger than those of the snaps
    crumbs = tub_and_room(crumbs, tub_db=-5.0, room_db=-32.0)
    rest = bumps() + squeaks() + hum() + background()
    return (cracks + crumbs + rest)[None]


def record(dry):
    """The loudest peaks overload the input and are clipped; then the top is cut."""
    clipped = np.clip(dry, -1, 1)
    low_pass = signal.ellip(10, .1, 70, CUTOFF_HZ, fs=SR, output="sos")
    return signal.sosfilt(low_pass, clipped)


dry = scene()
out = record(dry)
wav_out(out)
```